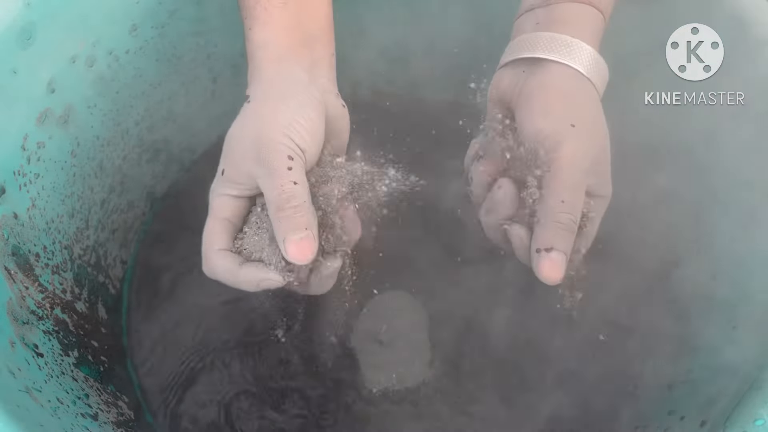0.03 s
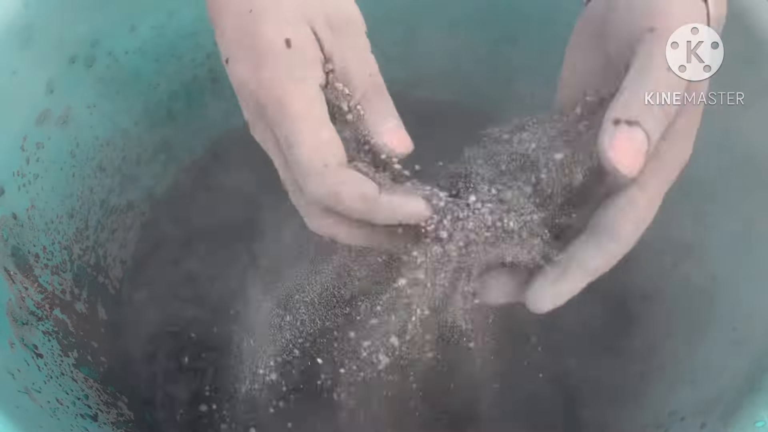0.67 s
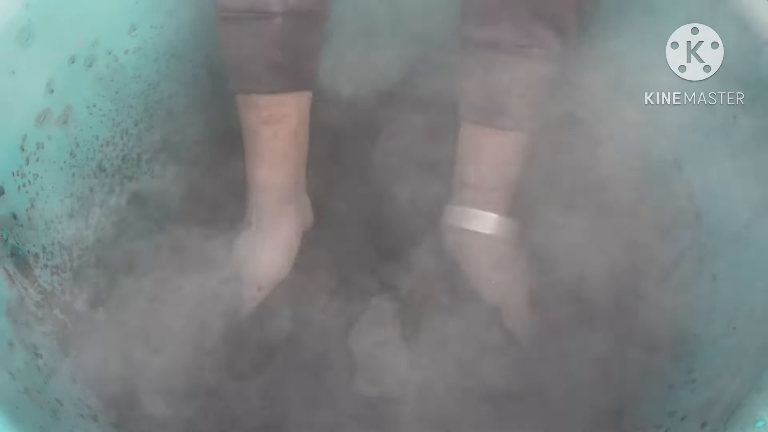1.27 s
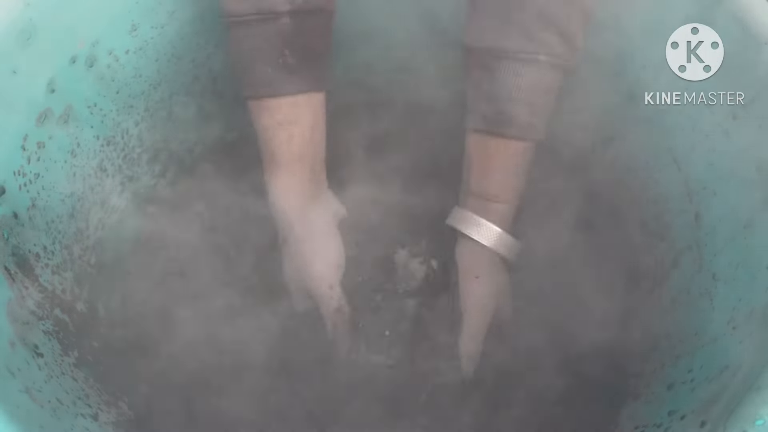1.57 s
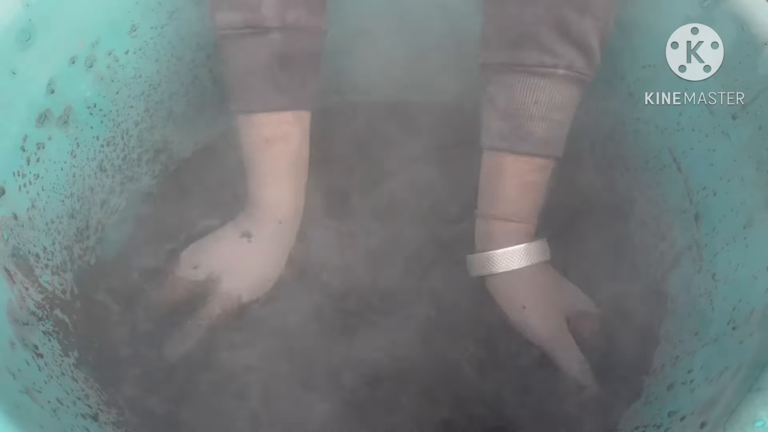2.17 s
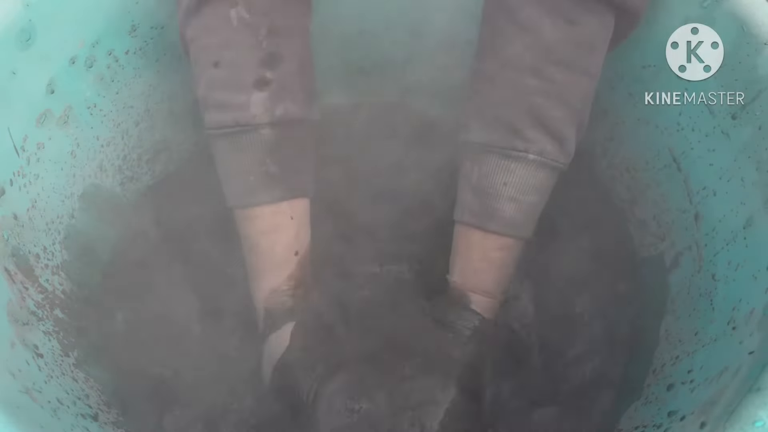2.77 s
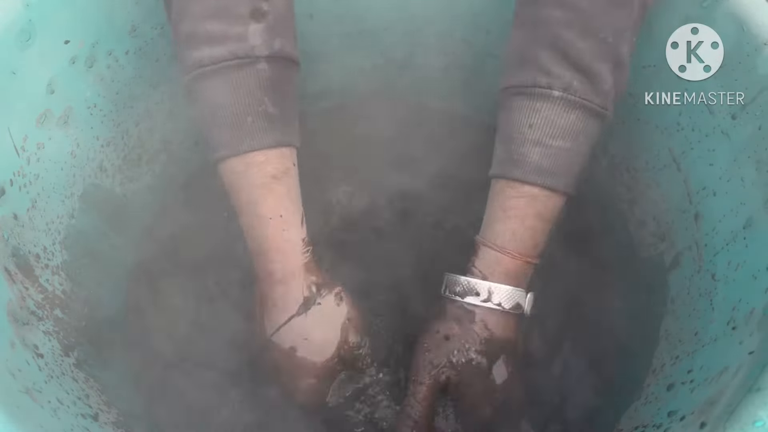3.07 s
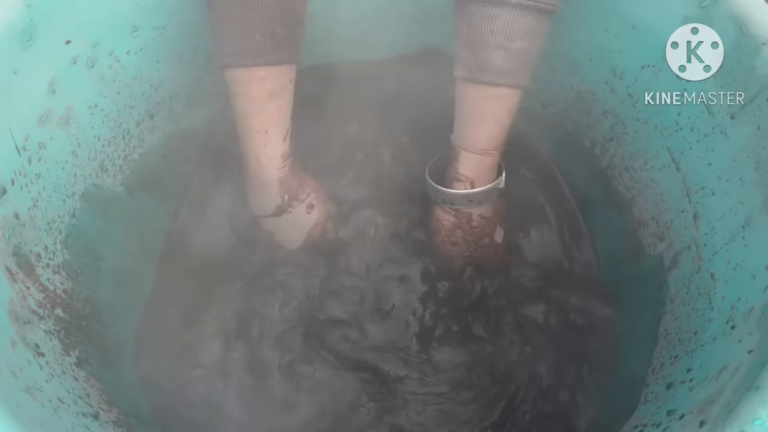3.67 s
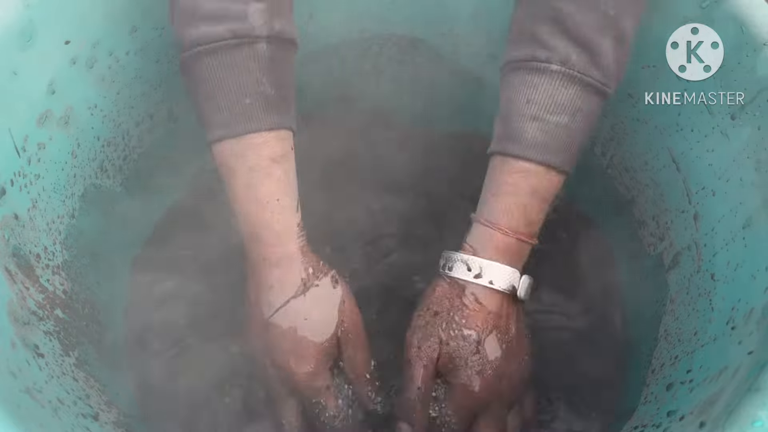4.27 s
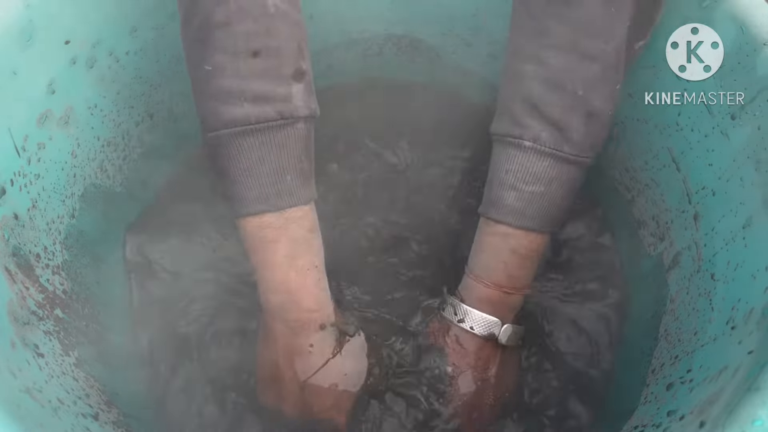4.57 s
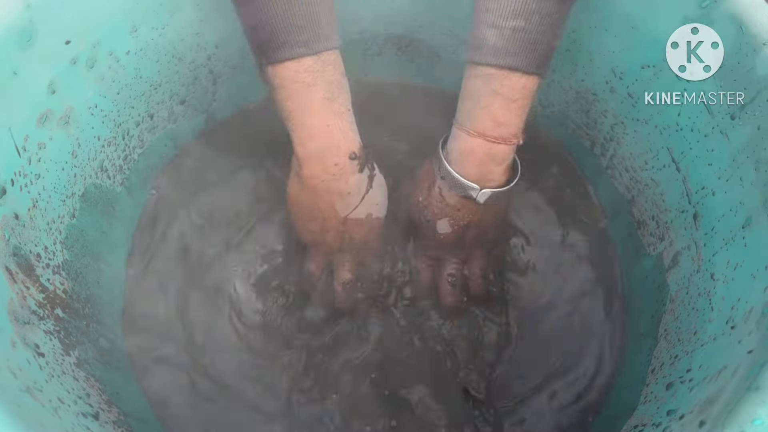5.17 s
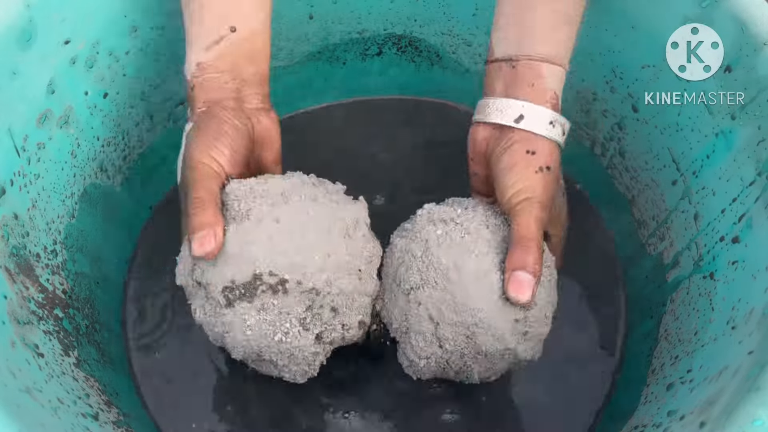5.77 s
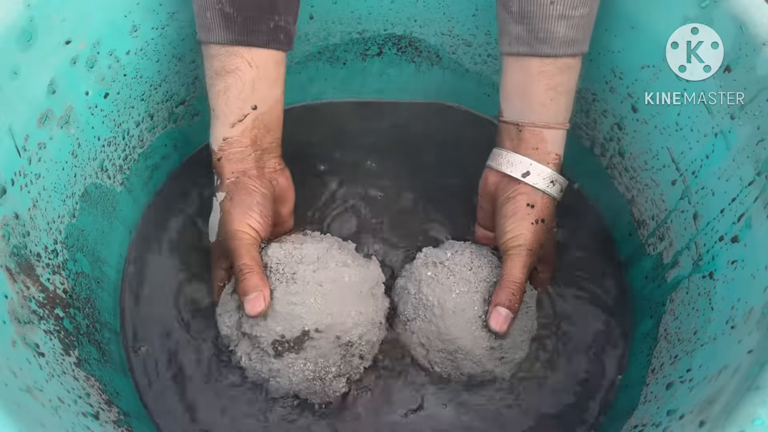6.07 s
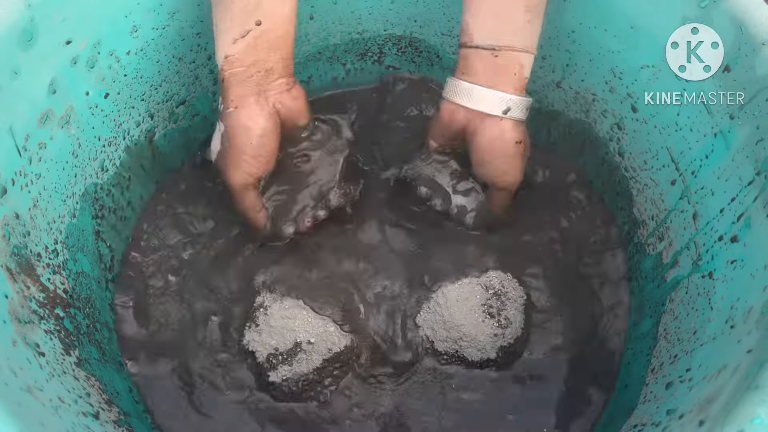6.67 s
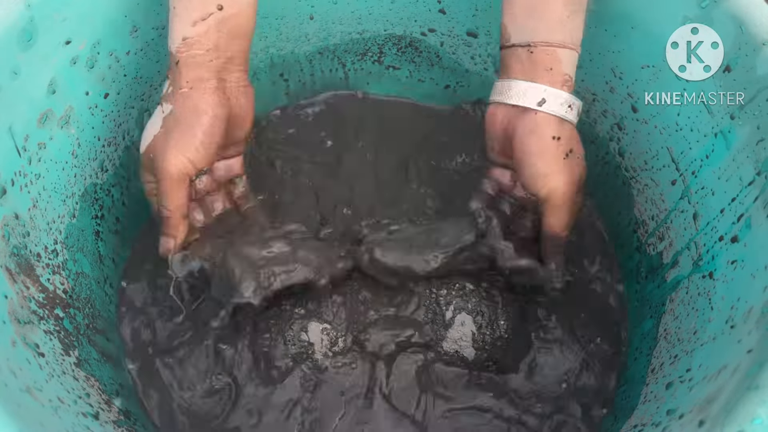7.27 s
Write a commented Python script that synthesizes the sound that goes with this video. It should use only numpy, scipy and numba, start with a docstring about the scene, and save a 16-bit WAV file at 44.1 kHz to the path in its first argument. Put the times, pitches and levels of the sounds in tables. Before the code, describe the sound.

Close up, dry lumps crack and crumble, spilling grit into a plastic tub. Several seconds of hands swishing through the water follow, full of gurgles, fizzing spray and wet drops. After a sudden short gap, fresh lumps scrape softly and water is scooped over them in bright splashes. The tub adds a slight hollow echo, while a low drone and light hiss run underneath.

```python
"""Crushing cement lumps over a tub of water

Two hands crush gritty lumps over a plastic tub, stir the muddy water, then dip two fresh lumps
and scoop water over them. Lumps crack, grit patters, trapped air rings as bubbles that mostly
rise in pitch, and spray ticks. The tub wall throws it all back, over a low drone and a faint hiss.
It is heard through the two microphone ports (small openings) of a phone just above the tub."""
import sys
import numpy as np
from scipy import signal
from scipy.fft import rfft, irfft, next_fast_len
from scipy.io import wavfile
from scipy.ndimage import uniform_filter1d, map_coordinates
from numba import njit

SR = 44100
rng = np.random.default_rng(int(sys.argv[2]) if len(sys.argv) > 2 else 0)


def dump(signal):
    """Clip the signal to [-1, 1] and save it as 16-bit WAV at the path in sys.argv[1]."""
    limited = np.clip(np.atleast_2d(signal).T, -1, 1)
    pcm = np.round(limited * 32767).astype(np.int16)
    wavfile.write(sys.argv[1], SR, pcm)


N = 322371


def undb(db):
    """Turn decibels into a number to multiply by."""
    return 10 ** (np.asarray(db) / 20)


def curve(table, column=1):
    """One column of a table, joined by straight lines in time."""
    rows = np.array(table, float)
    return np.interp(np.arange(N) / SR, rows[:, 0], rows[:, column])


def on_log_hz(points, hz):
    """Read between (frequency, value) points, giving each octave equal room."""
    f, value = np.transpose(points)
    return np.interp(np.log(hz + 1), np.log(f), value)


def filtered(x, response):
    """Multiply each frequency in a sound by response(hz)."""
    size = next_fast_len(N + 4096, True)
    hz = np.arange(size // 2 + 1) * SR / size
    return irfft(rfft(x, size) * response(hz), size)[..., :N]


def colour(x, points):
    """Make a sound duller or brighter, then set its average size (rms) to 1."""
    y = filtered(x, lambda hz: undb(on_log_hz(points, hz)))
    return y / y.std()


def walk(rate):
    """A smooth random wander, about 1 in size, taking `rate` steps a second."""
    steps = rng.standard_normal(4096)
    position = np.arange(0, N + 64, 64) / SR * rate
    return map_coordinates(steps, [position], order=3, mode="wrap").repeat(64)[:N]


def even(x, span_s):
    """Iron out slow changes of level and keep the fast grain."""
    size = int(span_s * SR / 2) + 1
    power = uniform_filter1d(uniform_filter1d(x ** 2, size), size)
    return x / np.sqrt(np.abs(power) + 1e-9 * np.mean(x ** 2))


def bands(x):
    """The low, middle and high parts of a sound, each held at a steady level."""
    def below(hz, edge_hz):
        return 1 / (1 + (hz / edge_hz) ** 8)
    low = even(filtered(x, lambda hz: below(hz, 1060) - below(hz, 150)), span_s=0.078)
    middle = even(filtered(x, lambda hz: below(hz, 4150) - below(hz, 830)), span_s=0.081)
    high = even(filtered(x, lambda hz: 1 - below(hz, 4100)), span_s=0.54)
    return np.array([low, middle, high])


def add(track, start_s, sound):
    """Mix a short sound into a track."""
    i = max(int(start_s * SR), 0)
    track[i:i + len(sound)] += sound[:max(N - i, 0)]


def gesture(start, length, attack_s, release_s):
    """The strength of one hand movement: it builds, holds and dies away."""
    t = np.arange(N) / SR - start
    return np.clip(t / attack_s, 0, 1) * np.exp(-np.clip((t - length) / release_s, 0, 30))


def clicks(per_s, spread_db, tail_s, tail):
    """Many faint and a few strong hits, each with a short scatter of noise behind it."""
    chance, size, sign = rng.random(N), rng.exponential(size=N), rng.choice([-1, 1], N)
    hits = (chance < per_s / SR) * sign * undb(spread_db * np.minimum(size, 6))
    t = np.arange(1024) / SR
    scatter = rng.standard_normal(len(t)) * np.exp(-t / tail_s)
    tail_power = signal.fftconvolve(hits ** 2, scatter ** 2 / np.sum(scatter ** 2))[:N]
    y = hits + tail * np.sqrt(np.abs(tail_power)) * rng.standard_normal(N)
    return y / y.std()


# How strong falling grit is from low to high: f/Hz, level/dB
GRIT_COLOUR = [(150, 8), (260, 4.5), (450, -11), (700, -13.5), (1500, -2.5), (3500, 1), (4900, -1),
               (5600, -2.5), (8000, -3), (12000, -1), (15500, -15.5)]
# The fingers squeeze a dry lump: t/s, length/s, level/dB
SQUEEZES = [(0.0, 0.035, -33.5), (0.044, 0.023, -22.5), (0.127, 0.088, -27.5), (0.225, 0.13, -26),
            (0.358, 0.13, -28.5), (0.472, 0.051, -27), (0.542, 0.053, -30), (0.607, 0.11, -28),
            (0.733, 0.17, -28), (0.908, 0.073, -23.5), (5.744, 0.012, -29.5), (5.89, 0.051, -30),
            (5.987, 0.056, -38.5), (6.127, .06, -36)]

def crumbling(attack_s=0.0098, trickle_db=-10.5, trickle_s=0.053):
    """Each squeeze lets dry grit stream out as tiny hits, and a thinner trickle follows."""
    stream = clicks(per_s=3000, spread_db=3.0, tail_s=0.0028, tail=0.96)
    stream *= undb(1.6 * walk(70))  # crumbs leave the fingers in clumps
    grit = undb([-18, 0, 1.5]) @ bands(colour(stream, GRIT_COLOUR))  # mix low, middle and high
    power = 0
    for start, length, db in SQUEEZES:
        flow = gesture(start, length, attack_s, release_s=0.029)
        trickle = undb(trickle_db) * gesture(start, length + trickle_s, attack_s, release_s=0.013)
        power += (undb(db) * np.maximum(flow, trickle)) ** 2
    return grit * np.sqrt(power)


def tone(hz, drift_hz):
    """A pure tone whose pitch wanders a little."""
    return np.sqrt(2) * np.sin(2 * np.pi * np.cumsum(hz + drift_hz * walk(4)) / SR)


# How strong the rumble is from low to high: f/Hz, level/dB
RUMBLE_COLOUR = [(20, -28), (40, -7), (52, -9), (80, -7.5), (105, 6), (135, -1.5), (170, -7), (400, -24.5),
                 (2000, -43), (12000, -68)]
# Tones in the drone, compared with the rumble: f/Hz, first level/dB, last level/dB
DRONE_TONES = [(54.2, -1.5, -6.5), (70, -4, -4.5), (81.6, -3, -7.5), (127, -9, -6), (143, -6.5, -9.5)]
# How loud the drone is: t/s, level/dB
DRONE_LEVEL = [(0, -38.5), (2.2, -37.5), (2.7, -33.5), (3.7, -36.5), (4.6, -35), (5.45, -37), (5.65, -38.5),
               (5.95, -40), (7.3, -38)]

def drone():
    """A low rumble with a few wavering tones, nearly the same left and right."""
    tones = 0
    for hz, first_db, last_db in DRONE_TONES:
        level_db = np.linspace(first_db, last_db, N) + 2.6 * walk(2.445)
        tones += undb(level_db) * tone(hz, drift_hz=1.177)
    rumble = colour(rng.standard_normal(N), RUMBLE_COLOUR)
    width = undb(-13.0) * colour(rng.standard_normal(N), RUMBLE_COLOUR) * np.array([[1], [-1]])
    return undb(curve(DRONE_LEVEL)) * (rumble + tones + width)


# How loud the hum is: t/s, level/dB
HUM_LEVEL = [(0.0, -38), (0.51, -32), (1.02, -41.5), (3.0, -30), (5.92, -43), (6.72, -32.5), (7.31, -31.5)]

def mains_hum():
    """Mains electricity hums on one low note."""
    return undb(curve(HUM_LEVEL)) * tone(hz=99.3, drift_hz=0.62)


def sinking_tone(peak_s=5.4, peak_db=-33.5, fade_db_per_s=4, hz_at_peak=76.6, sink_hz_per_s=10):
    """One low tone swells and fades while its pitch keeps sinking."""
    t = np.arange(N) / SR - peak_s
    level_db = peak_db - fade_db_per_s * np.abs(t) + 1.5 * walk(4.44)
    return undb(level_db) * tone(hz_at_peak - sink_hz_per_s * t, drift_hz=0.58)


# How strong the hiss is from low to high: f/Hz, level/dB
HISS_COLOUR = [(300, -6.5), (2000, -9), (6000, 1), (12000, 3), (15500, -3.5)]

def hiss():
    """A faint, steady, bright hiss behind everything."""
    return undb(-40) * colour(rng.standard_normal(N), HISS_COLOUR)


def snaps(table, attack_s, crack_s, tail_s, tail_db, ring_s, ring_db):
    """Each snap is a sharp crack, a very short ring and a trail of fragments."""
    out, t = np.zeros(N), np.arange(2048) / SR
    for start, db, hz in table:
        fade = np.exp(-t / crack_s) + undb(tail_db) * np.exp(-t / tail_s)
        low_cut = signal.butter(1, 0.14 * hz, "high", fs=SR)
        crack = signal.lfilter(*low_cut, rng.standard_normal(len(t)) * fade)
        ping = undb(ring_db) * np.sin(2 * np.pi * hz * t) * np.exp(-t / ring_s)
        snap = (crack + ping) * (1 - np.exp(-t / attack_s))
        # the level sets the snap's total energy, whatever its fragments do
        add(out, start + 0.0002, undb(db + 17.5) * snap / np.linalg.norm(snap))
    return out


# Cracks in a lump: t/s, level/dB, brightest f/Hz
LUMP_CRACKS = [(0.3177, -2.5, 2670), (0.3394, -7, 4730), (0.5182, -0.5, 2820), (0.5765, -5.5, 1200),
               (0.694, -10, 3900)]

def lump_cracks():
    """A dry lump gives way with sudden, hard cracks."""
    return snaps(LUMP_CRACKS, attack_s=0.0001, crack_s=0.00096, tail_s=0.003, tail_db=-11.5,
                 ring_s=0.00038, ring_db=0.5)


@njit
def ring(start, hz, size, cycles, rise):
    """Bubbles swell within a cycle and fade; with rise > 0 the pitch climbs, as near the surface."""
    out = np.zeros(N)
    for k in range(len(start)):
        first, life = int(start[k] * SR), cycles[k] / hz[k] * SR  # both in samples
        swing = size[k] + 0j  # a point spinning round a circle; its height is the wave
        turn = np.exp(-1 / life + 2j * np.pi * hz[k] / SR)
        glide = np.exp(2j * np.pi * hz[k] / SR * rise[k] / life)
        shut, opening = 1., np.exp(-hz[k] / SR / .7)
        for i in range(max(first, 0), min(first + int(6 * life), N)):
            swing *= turn
            turn *= glide
            shut *= opening
            out[i] += swing.imag * (1 - shut)
    return out


# How strong fizz and splashing water are from low to high: f/Hz, level/dB
WATER_COLOUR = [(150, -2.5), (280, -5.5), (500, 1), (800, -3.5), (1900, 3), (3200, 1), (4700, 0.5),
                (5500, -3), (8400, -5), (12000, -4.5), (15500, -17.5)]
# Single big bubbles: t/s, f/Hz, level/dB, cycles to fade to 37 %, share the pitch climbs per cycle
BIG_BUBBLES = [(0.49, 980, -3, 1.94, 0.014), (0.82, 1154, -11.5, 3, 0.0077), (1.103, 1590, 3.5, 1.8, 0.031),
               (1.12, 1290, -6.5, 2.8, 0.013), (1.217, 1730, -11.5, 9.3, 0.014),
               (1.346, 1095, -15.5, 5.4, 0.015), (1.654, 1750, -10, 5.4, 0.0087),
               (1.689, 1830, -9, 3.6, 0.02), (1.91, 830, -6.5, 1.85, 0.025),
               (2.031, 1080, -7.5, 4.2, 0.016), (2.066, 1130, -1, 2.4, 0.03), (2.067, 2300, 1, 3.2, .01),
               (2.153, 3050, -2.5, 4.4, .01), (2.162, 1300, -9, 3.5, 0.022), (2.177, 617, -8.5, 2.9, 0.009),
               (2.193, 726, -9, 3.8, 0.02), (2.259, 972, -6.5, 7, 0.01), (2.317, 2040, -9.5, 9.7, 0.012),
               (2.504, 339, -7, 2.1, 0.0057), (2.658, 400, -9.5, 2.3, -0.01),
               (2.771, 1600, -10.5, 9.6, 0.018), (2.825, 1270, -7, 4.1, 0.017),
               (2.848, 1610, -5.5, 4.8, 0.03), (2.873, 510, -5, 5, -0.012), (2.909, 3570, -0.5, 4.4, 0.016),
               (3.008, 557, -14, 5.5, -0.011), (3.104, 1150, -8.5, 3, .016),
               (3.168, 2730, -2.5, 3.7, 0.0096), (3.313, 1520, 1, 2, 0.024), (3.32, 550, -11, 3.8, 0.002),
               (3.322, 2430, -4.5, 4.7, 0.01), (3.975, 1200, -9, 3.7, 0.0061), (4.063, 730, -10, 8.9, .012),
               (4.058, 1130, -10.5, 9.4, 0.012), (4.118, 465, -10.5, 6.3, -0.0012),
               (4.128, 1940, 0, 3.3, 0.0023), (4.163, 453, -11, 6.3, 0.0054),
               (4.2, 1320, -3.5, 4.6, 0.0096), (4.2, 2180, -6, 6.3, 0.0038), (4.204, 270, -3, 1.6, 0.0088),
               (4.238, 285, -7.5, 3.4, 0.0041), (4.268, 3950, -9, 6.5, -0.023),
               (4.324, 1960, -6, 6.2, 0.0048), (4.424, 2690, -2.5, 12, 0.016), (4.454, 1430, -7, 4, 0.024),
               (4.525, 3130, 4.5, 3.3, 0.0097), (4.526, 1640, -4.5, 13, 0.035),
               (4.852, 1210, -3, 4.7, 0.023), (4.983, 1830, -7, 4, 0.011), (5.024, 3870, -1.5, 3.6, 0.0082),
               (5.045, 4140, -5, 7, -0.00097), (5.286, 515, -6, 5.5, 0.049),
               (5.451, 618, -15.5, 5.2, 0.0068), (6.07, 3260, -20, 7.5, -0.00023),
               (6.413, 3230, -11, 5.9, 0.013), (6.45, 292, -19.5, 2, .02), (6.594, 830, -16, 2.8, 0),
               (6.626, 668, -16.5, 6.7, 0.045), (6.656, 843, -16.5, 5.8, 0.03),
               (6.689, 1260, -11, 3.7, 0.006), (6.707, 1390, -3, 1.7, 0.027), (6.75, 814, -15, 11.6, 0.016),
               (6.84, 2190, -2.5, 2.6, -0.0086), (6.86, 1410, -13.5, 4, 0.032),
               (6.88, 1290, -17, 20, 0.011), (6.912, 1025, -10, 6, 0.04), (6.911, 1720, -1, 2.8, 0.026),
               (6.936, 1780, 3, 4.5, 0.015), (6.942, 1240, -4, 2.7, 0.0068), (6.951, 1940, 3, 1.8, 0.017),
               (7.046, 496, -15.5, 6.1, 0.014), (7.113, 1107, -15, 10.6, 0.019),
               (7.16, 2595, -11.5, 16, -0.0076), (7.174, 1706, -7, 6.4, 0.013),
               (7.181, 880, -19.5, 7.9, 0.042), (7.287, 1020, -14.5, 4.4, 0.016)]

def plops(wobble=0.16, ripple_s=0.00007, fizz_db=-8.5, fizz_s=0.0014, deep_below_hz=890):
    """The fingers pinch off pockets of air: deep ones gulp, shallow ones chirp and briefly fizz."""
    start, hz, db, cycles, climb = np.array(BIG_BUBBLES, float).T.copy()
    cycles = np.maximum(cycles, 1)
    bubbles = ring(start, hz, undb(db), cycles, climb * cycles)
    # the churning mud kneads each pocket, so its pitch and strength waver
    wavering_time = np.arange(N) + ripple_s * SR * walk(160)
    bubbles = map_coordinates(bubbles, [wavering_time], order=3, mode="nearest")
    bubbles *= 1 + wobble * walk(300)
    # low-pitched bubbles lie deep and throw off little fizz
    shallow = ring(start, hz, undb(db) * hz / np.hypot(hz, deep_below_hz), cycles, climb * cycles)
    fade = np.exp(-1 / (fizz_s * SR))
    fizz_level = np.sqrt(signal.lfilter([1 - fade], [1, -fade], shallow ** 2 + 1e-18))
    fizz = colour(rng.standard_normal(N), WATER_COLOUR)
    return undb(0.5) * bubbles + undb(fizz_db) * fizz_level * fizz


def froth(low_hz, high_hz, spread_db, cycles, rise, count):
    """A swarm of small bubbles, each ringing at its own random time and pitch."""
    when, pitch, strength, damping, depth = rng.random((count, 5)).T
    hz = (np.sqrt(low_hz) + pitch * (np.sqrt(high_hz) - np.sqrt(low_hz))) ** 2
    life = cycles * 2 ** (2 * damping - 1)
    level_db = spread_db * np.minimum(-np.log(1 - strength), 5)
    size = undb(level_db) * hz ** .75 / np.sqrt(life)
    y = ring(when * N / SR, hz, size, life, 2 * rise * depth)
    return y / y.std()


# The hands stir under the surface: t/s, low wash level/dB, fizz level/dB
STIRRING = [(1.0, -39, -51), (1.07, -48, -43), (1.2, -36, -37.5), (1.5, -30.5, -37.5), (1.62, -35.5, -32),
            (1.8, -36, -32), (2.25, -38.5, -29), (2.45, -30, -29.5), (2.75, -33.5, -36), (3.1, -35, -30),
            (3.8, -32, -35.5), (4.2, -37.5, -29), (4.62, -28.5, -31.5), (4.9, -30.5, -35.5),
            (5.3, -33.5, -31), (5.75, -52, -51.5), (6.2, -39.5, -44), (6.5, -43.5, -49.5), (6.75, -49, -40),
            (7.3, -45, -38)]
# A hand breaks the surface: t/s, length/s, level/dB, deep slosh/dB, spray/dB
# (slosh and spray are added to the level)
SPLASHES = [(1.083, 0.055, -25, -18, -4), (1.321, 0.039, -45, 9, 10), (1.665, 0.062, -28.5, -7, -3.5),
            (1.883, 0.23, -27, -29, 1.5), (2.068, 0.02, -22, -28, 6.5), (2.141, 0.074, -25.5, -11, 3.5),
            (2.234, 0.084, -23.5, -17, -2), (2.48, 0.15, -27.5, -4.5, 0.5), (2.626, 0.042, -33, 7.5, 5),
            (2.856, 0.075, -26.5, -1.5, -1), (2.976, 0.11, -31, 1, 0), (3.09, 0.14, -25.5, -21, -2),
            (3.301, 0.067, -27, -6, -1), (3.372, 0.085, -30, -4.5, -4), (3.97, 0.011, -33, -1, -14),
            (4.021, 0.21, -25, -3, -2), (4.285, 0.066, -26, -4, -1), (4.442, 0.03, -33.5, -11, 2),
            (4.513, 0.03, -16, -18, 1), (4.95, 0.17, -23.5, -6.5, -5.5), (5.112, 0.3, -31, -13.5, 1),
            (5.354, 0.15, -26.5, -12, -8.5), (6.397, 0.046, -36, -21, -3), (6.575, 0.15, -28.5, -14, -1),
            (6.818, 0.15, -24.5, -36, 1), (6.911, 0.035, -19.5, -18, -6), (6.934, 0.018, -14, -9.5, -6),
            (7.002, 0.09, -33, -3.5, 0), (7.158, 0.04, -30.5, -4, -5), (7.242, 0.08, -32, -21, 1)]

def muddy_water(stir_grain=0.45, splash_grain=0.95):
    """Stirring makes a dull, smooth wash; brisk strokes break the water into froth and fine spray."""
    bubbles = froth(low_hz=183.0, high_hz=4812, spread_db=3.5, cycles=2.8, rise=0.081, count=7000)
    spatter = clicks(per_s=800, spread_db=3.5, tail_s=0.002, tail=1.0)
    spray = clicks(per_s=900, spread_db=5.0, tail_s=0.001, tail=1.0)
    low, middle, _ = bands(colour(bubbles + undb(-2) * spatter, WATER_COLOUR))
    _, _, high = bands(colour(spray, WATER_COLOUR))
    grain = np.array([low, middle, high])
    wash = bands(colour(rng.standard_normal(N), WATER_COLOUR))
    wash *= undb(3.5 * walk(45))  # it heaves as the fingers pass through
    fizz_db = curve(STIRRING, column=2)
    stir_power = undb([curve(STIRRING), fizz_db, fizz_db - 3.5]) ** 2  # low, middle, high
    splash_power = 0
    for start, length, db, slosh_db, spray_db in SPLASHES:
        # a longer stroke takes longer to gather speed
        stroke = gesture(start, length, attack_s=0.0028 + 0.049 * length, release_s=0.011)
        splash_power += np.outer(undb([db + slosh_db, db, db + spray_db]), stroke) ** 2
    # a share of the power goes into separate bubbles and drops (the grain); the rest is wash
    grain_power = stir_grain * stir_power + splash_grain * splash_power
    wash_power = stir_power + splash_power - grain_power
    return np.sum(grain * np.sqrt(grain_power) + wash * np.sqrt(wash_power), axis=0)


# Falling drops: t/s, level/dB, brightest f/Hz
DROPS = [(1.0909, -10.5, 2090), (1.1216, -20, 1590), (1.184, -15, 3970), (1.6944, -12, 2680),
         (1.9423, -12, 2580), (2.074, -10, 4100), (2.1312, -10, 3550), (2.152, -6, 2880),
         (2.175, -12, 3940), (2.193, -7.5, 4300), (2.254, -8, 3100), (2.5468, -13.5, 3370),
         (2.6502, -8, 1870), (2.782, -10, 3090), (3.0677, -10, 2250), (3.3212, -3.5, 3240),
         (3.3567, -9.5, 4030), (3.414, -10.5, 4140), (4.115, -9, 2270), (4.334, -6.5, 2920),
         (4.4294, -6, 4850), (4.5317, -11, 2200), (4.533, -3.5, 4230), (4.7809, -12.5, 3220),
         (4.8513, -15.5, 1590), (4.9932, -9, 3580), (5.0745, -7, 2000), (5.3134, -12.5, 3260),
         (6.637, -13, 4690), (6.8205, -12.5, 2720), (6.879, -5, 4610), (6.952, -2, 4520),
         (7.248, -10.5, 2530)]

def drops():
    """Drops land on the water with a wet snap."""
    return snaps(DROPS, attack_s=0.00095, crack_s=0.00097, tail_s=0.0029, tail_db=-6.5,
                 ring_s=0.0016, ring_db=2.5)


# Tiny bubbles bursting at the surface: t/s, level/dB
BURSTS = [(1.218, -17), (1.239, -12), (1.333, -11.5), (1.362, -13), (1.942, -30), (1.968, -19),
          (2.0077, -11), (2.176, -14), (2.242, -18), (2.3354, -13), (2.4935, -12), (2.654, -4),
          (2.683, -11), (3.014, -3.5), (3.069, -15), (3.769, -9.5), (3.883, -21), (3.961, -15.5),
          (4.006, -13.5), (4.079, -9), (4.191, -16), (4.995, -8.5), (5.315, -13), (6.381, -14.5),
          (6.534, -19.5), (6.6062, -13), (7.015, -14)]

def bursting_bubbles(decay_s=0.0014, low_hz=2500):
    """The thin skin of a bubble breaks with one tick of bright noise."""
    out, t = np.zeros(N), np.arange(512) / SR
    low_cut = signal.butter(1, low_hz, "high", fs=SR)
    for start, db in BURSTS:
        burst = signal.lfilter(*low_cut, rng.standard_normal(len(t)) * np.exp(-t / decay_s))
        add(out, start, undb(db + 16) * burst / np.linalg.norm(burst))
    return out


def echoes(x, fade_s, delay_s):
    """A blur of echoes, different left and right, that dies away by 60 dB in fade_s."""
    t = np.arange(SR // 3) / SR
    response = rng.standard_normal((2, len(t))) * undb(-60 * t / fade_s) * (t > delay_s)
    response /= np.sqrt(np.sum(response ** 2, axis=1, keepdims=True))
    return signal.oaconvolve(x[None], response, axes=1)[:, :N]


def tub(x, wall_fade_s=0.034, boom_below_hz=1300):
    """Sound bounces off the tub wall, the air inside booms briefly, and the room answers faintly."""
    place = np.pi * walk(25)  # each drop lands somewhere else, so its echoes take other paths
    walls = echoes(x * np.cos(place), wall_fade_s, delay_s=0.00012)
    walls += echoes(x * np.sin(place), wall_fade_s, delay_s=0.00064)
    lows = filtered(x, lambda hz: 1 / (1 + 1j * hz / boom_below_hz) ** 2)
    boom = echoes(lows, fade_s=0.078, delay_s=0.0017)
    room = echoes(x, fade_s=0.2, delay_s=0.011)
    return undb(-8.0) * walls + undb(-8.5) * boom + undb(-21.5) * room


# How far the wave at the left port runs ahead of the right: f/Hz, lead/radians
LEFT_LEAD = [(0, 0), (1200, 0), (1550, 1.2), (1850, .1), (2900, 1), (4600, .5), (6800, -1.5),
             (8400, -np.pi), (12000, -2 * np.pi), (15700, -3 * np.pi)]
# How much louder the left port is than the right: f/Hz, level/dB
LEFT_BOOST = [(60, .5), (200, 1.3), (500, 3.3), (1300, 3.6), (2200, 1.55), (4400, 5.6), (8000, 0.16)]

def ports(x):
    """The sound reaches the two microphone ports at different times and strengths."""
    def response(hz):
        lead = np.interp(hz, *np.transpose(LEFT_LEAD))
        side = np.array([[.5], [-.5]])
        return undb(side * on_log_hz(LEFT_BOOST, hz)) * np.exp(1j * side * lead)
    return filtered(x, response)


# The level of everything dips briefly: t/s, level/dB
LEVEL_DIP = [(5.49, -4), (5.56, -8), (5.578, -50), (5.6, -53.5), (5.63, -24.5), (5.74, -4.5), (5.9, -1)]

def scene(hand_spread_db=2.5):
    """Grit, water and bubbles echo in the tub, over the low background tones."""
    near = crumbling() + muddy_water() + plops() + bursting_bubbles() + lump_cracks() + drops()
    reflections = tub(near)
    # the sound comes now from the left hand, now from the right
    hands = near * undb(hand_spread_db * walk(22) * np.array([[.5], [-.5]]))
    foreground = ports(hands + reflections + hiss())
    background = (drone() + mains_hum() + sinking_tone()) * undb([[.4], [-.4]])  # a touch to the left
    return (foreground + background) * undb(curve(LEVEL_DIP))


def record(dry):
    """The phone flattens peaks beyond full scale and cuts the highest treble."""
    top_hz = 15700
    lowpass = signal.ellip(10, .2, 70, top_hz, fs=SR, output="sos")
    return signal.sosfilt(lowpass, np.clip(dry, -1, 1))


dry = scene()
out = record(dry)
dump(out)
```